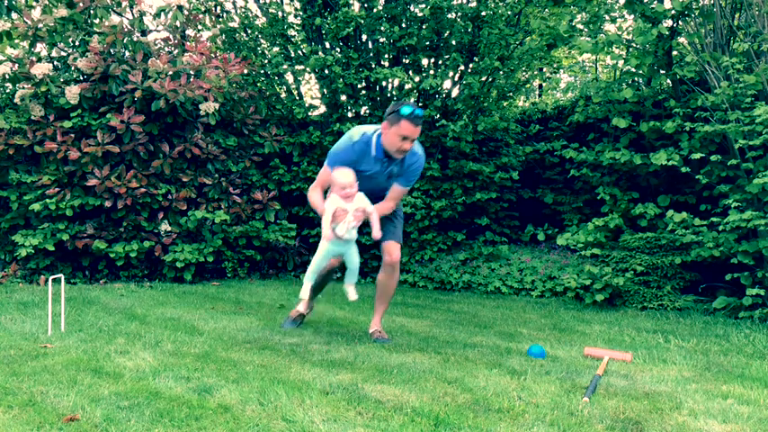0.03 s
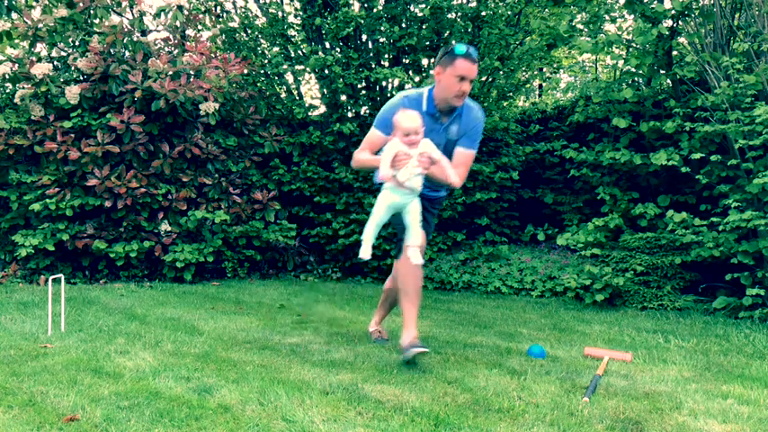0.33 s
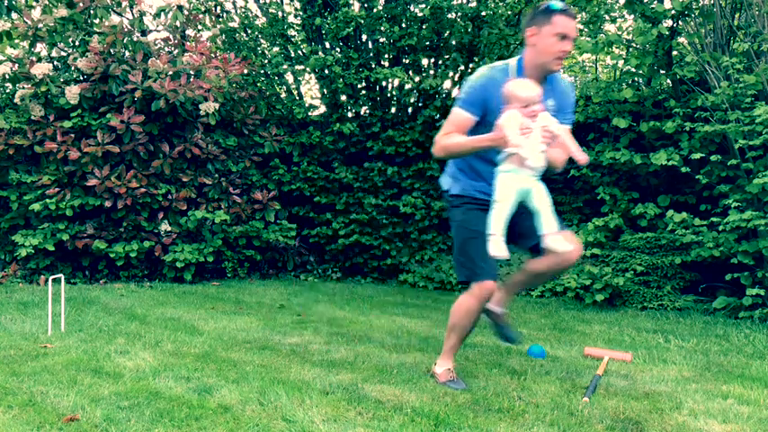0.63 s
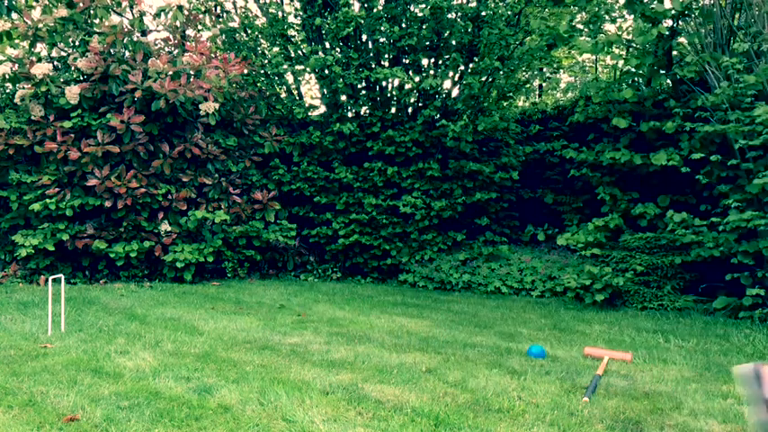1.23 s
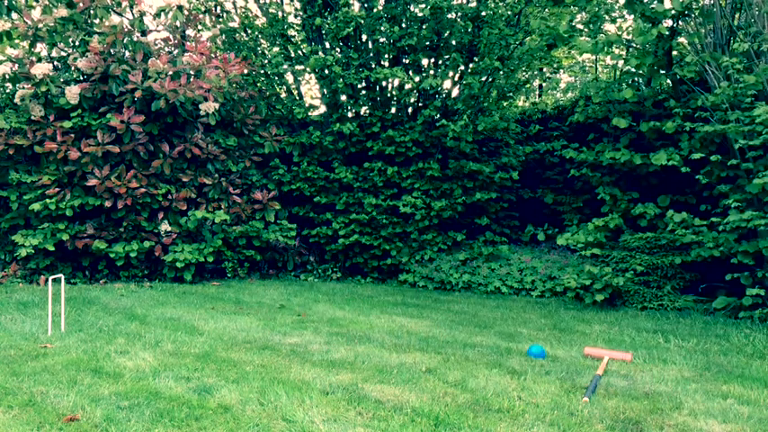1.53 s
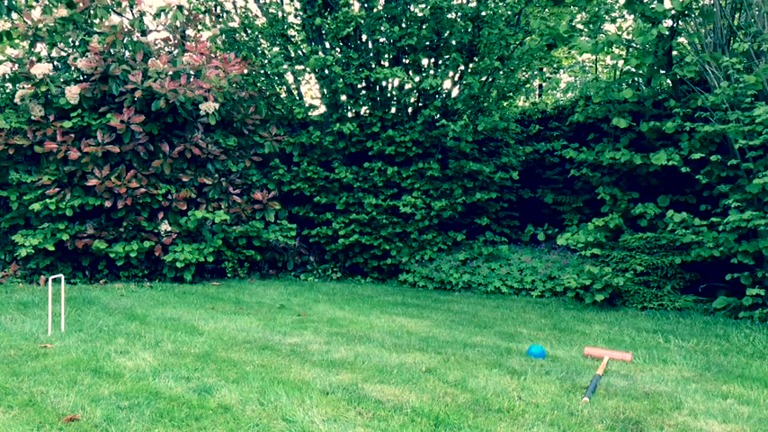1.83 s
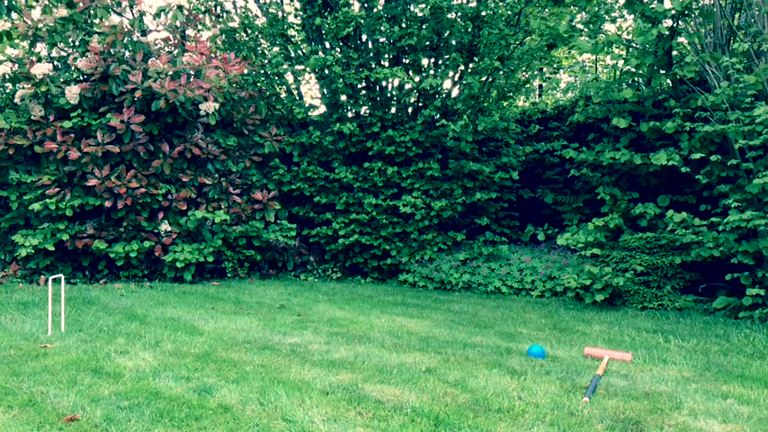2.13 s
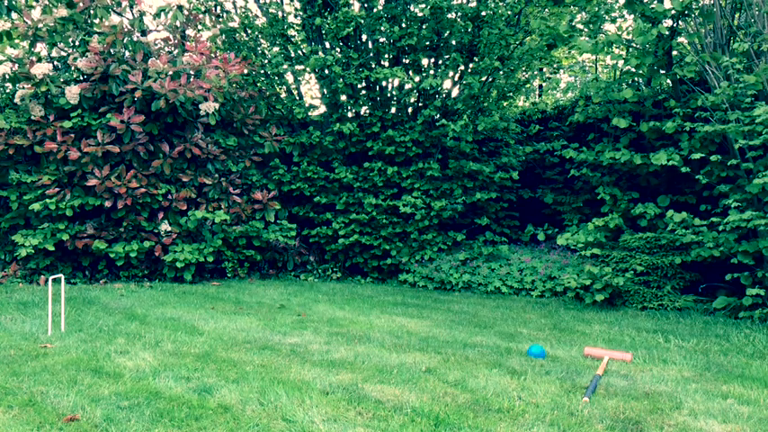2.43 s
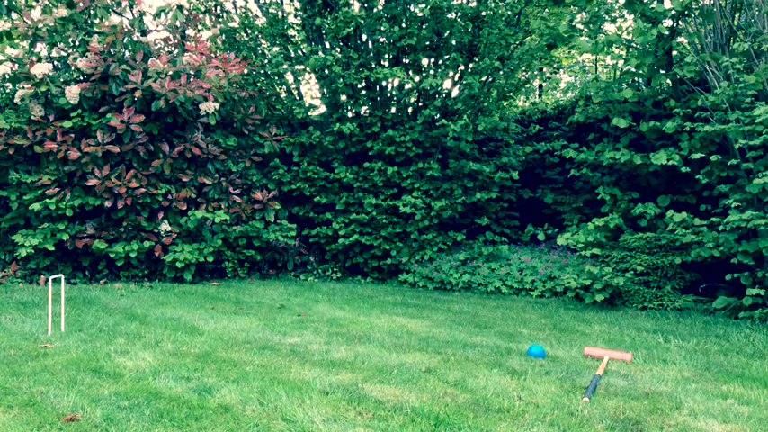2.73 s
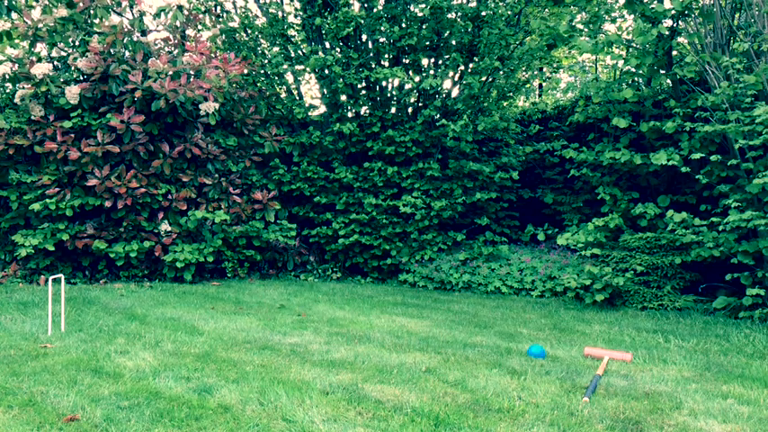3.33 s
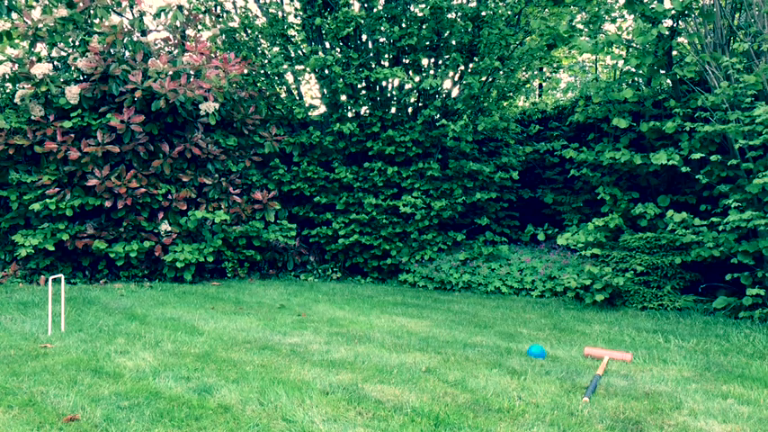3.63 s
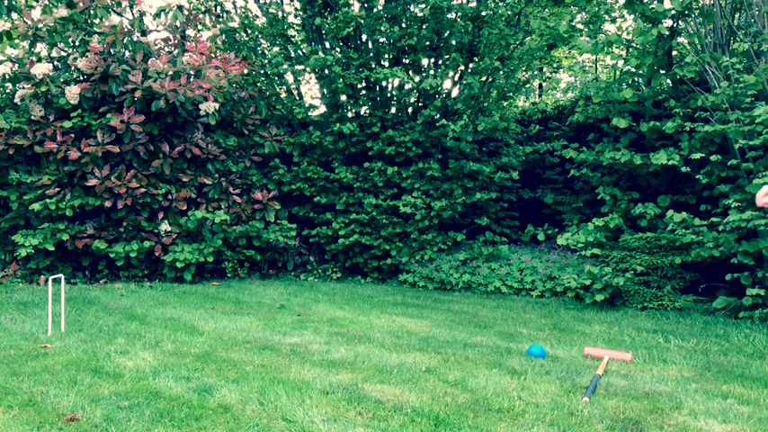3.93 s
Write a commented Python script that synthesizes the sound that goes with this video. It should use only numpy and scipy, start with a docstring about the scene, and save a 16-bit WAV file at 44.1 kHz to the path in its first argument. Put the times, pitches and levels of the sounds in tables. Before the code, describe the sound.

Someone jogs past on a garden lawn with soft, swishing steps and a faint rustle of clothes. The steps turn fainter and a small bird starts chirping in the hedge, over low wind rumble and a distant engine drone.

```python
"""A jogger on a garden lawn.

Someone jogs past and moves about further off, clothes rustling: each step excites a swish of grass and
a crunch of turf, with a few small resonant snaps. A small bird in the hedge sings frequency-modulated
tones (three short notes, a quick trill, five falling chirps), scattered by the hedge and the trees.
Behind them, two far engines drone in harmonics of their cycle rates under a low rumble of wind."""
import sys
import numpy as np
from scipy import signal
from scipy.io import wavfile

SR = 44100
rng = np.random.default_rng(int(sys.argv[2]) if len(sys.argv) > 2 else 0)


def bounce(signal):
    """Save signal as a 16-bit WAV file at the path given by the first command-line argument."""
    frames = np.transpose(np.atleast_2d(signal))
    limited = np.clip(frames, -1, 1)
    pcm = np.round(limited * 32767).astype(np.int16)
    wavfile.write(sys.argv[1], SR, pcm)


N = 176400
TIME = np.arange(N) / SR
HISS_FLICKER_DB = .7

# Gusts of the low wind: (time [s], level [dB])
GUSTS = [(0, -50), (.5, -45.5), (1.0, -46), (1.7, -47), (2.2, -46.5), (2.45, -46.5), (2.9, -48.5),
         (3.5, -52), (4, -49.5)]


def from_db(db):
    """Amplitude ratio of a level in decibels."""
    return 10 ** (np.asarray(db) / 20)


def rms_one(x):
    """Normalisation to unit mean power."""
    return x / np.sqrt(np.mean(x ** 2) + 1e-20)


def envelope(rows):
    """Amplitude envelope interpolated through (time [s], level [dB]) rows."""
    return from_db(np.interp(TIME, *np.transpose(rows)))


def drift(rate_hz):
    """Slow random modulation of unit rms: two-pole low-passed noise, drawn every 100 samples."""
    pole = np.exp(-200 * np.pi * rate_hz / SR)
    slow = signal.lfilter([1], [1, -2 * pole, pole * pole], rng.standard_normal(N // 100 + 2002))[2000:]
    return np.interp(np.arange(N) / 100, np.arange(len(slow)), rms_one(slow))


def flutter(hz, size):
    """Fast random modulation of unit rms, whose sidebands spread a tone into a band."""
    return rms_one(signal.sosfilt(signal.butter(2, hz, fs=SR, output="sos"), rng.standard_normal(size)))


def white():
    """Two uncorrelated white noises."""
    return rng.standard_normal((2, N))


def colour(sources, spectrum, flicker_db):
    """Spectral shaping to unit rms: flickering third-octave bands, taken in turn from two sources."""
    hz, db = np.transpose(spectrum)
    out, edges = 0, 25 * 2 ** (np.arange(30) / 3)
    for k, (low, high) in enumerate(zip(edges, edges[1:])):
        centre = np.sqrt(low * high)
        if hz[0] / np.sqrt(2) < centre < hz[-1] * np.sqrt(2):
            bandpass = signal.butter(2, [low, high], "band", fs=SR, output="sos")
            band_db = np.interp(np.log(centre), np.log(hz), db) + flicker_db * drift(5.7)
            out = out + signal.sosfilt(bandpass, sources[k % 2]) * from_db(band_db)
    return rms_one(out)


def add(out, onset, sound):
    """Superposition of a sound from its onset in seconds."""
    start = int(np.clip(onset * SR, 0, N))
    out[start:start + len(sound)] += sound[:N - start]


def wind():
    """Broadband flow noise: a low rumble, a far rush of air and a faint hiss."""
    # Spectra: (frequency [Hz], relative spectral density [dB])
    rumble_spectrum = [(30, -16), (45, 4), (70, 2), (110, -5), (170, -1.5), (260, 4.5), (360, 3.5),
                       (480, -1), (700, -14), (1400, -26)]
    air_spectrum = [(300, -8), (550, 0), (900, 3), (1200, -1.5), (1700, -8.5), (2100, -20), (2600, -33.5),
                    (4000, -43)]
    hiss_spectrum = [(2500, -2.5), (5000, -2), (7000, -4), (10000, -6), (15500, -5)]
    # Swells of the air: (time [s], level [dB])
    air_swells = [(0.0, -54.5), (0.46, -48), (0.66, -53.5), (1.83, -52.5), (1.9, -54), (2.74, -53.5),
                  (3.17, -51.5), (3.5, -54), (4.0, -52)]
    rumble = envelope(GUSTS) * colour(white(), rumble_spectrum, flicker_db=1.5)
    air = envelope(air_swells) * from_db(.24) * colour(white(), air_spectrum, flicker_db=1.8)
    hiss = from_db(-75) * colour(white(), hiss_spectrum, HISS_FLICKER_DB)
    return rumble + air + hiss


def engine(cycle_hz, harmonics, wander=.0019, fade_db=1.11, carried_above_hz=290):
    """Harmonic series of a wandering cycle rate; each partial fades, and the wind carries the upper ones."""
    phase = 2 * np.pi * np.cumsum(cycle_hz * (1 + wander * drift(1.235))) / SR
    carried = rms_one(envelope(GUSTS))
    out = 0
    for order, db in harmonics:
        gain = from_db(db + fade_db * drift(2.25))
        if order * cycle_hz > carried_above_hz:
            gain = gain * carried
        out = out + gain * np.sin(order * phase + rng.uniform(0, 2 * np.pi))
    return np.sqrt(2) * out


def drone():
    """Two far engines and two narrow-band hums, superposed under one slow envelope."""
    # Engine line spectra: (harmonic number, level before the envelope [dB])
    fast_harmonics = [(5, -61), (6, -41), (7, -50), (9, -42.5), (11, -56.5), (12, -55.5), (13, -53),
                      (14, -58.5), (15, -56.5), (16, -62.5), (18, -58.5), (20, -55), (21, -56.5),
                      (22, -62.5), (23, -55), (24, -65), (25, -66), (29, -66)]
    slow_harmonics = [(12, -42), (18, -48), (24, -65), (25, -62), (30, -55.5), (40, -57.5)]
    # Wavering hums: (frequency [Hz], rms deviation [Hz], level before the envelope [dB])
    hum_tones = [(79.85, 1.22, -45.5), (228.4, 2.56, -54.5)]
    # Common envelope: (time [s], gain [dB])
    swells = [(0, -4), (.7, -1.5), (1.3, 1), (1.75, 1.5), (2.05, -1.5), (2.45, 1.5), (3.0, -2), (3.4, -1),
              (4, -1)]
    hums = 0
    for hz, deviation, db in hum_tones:
        amplitude = np.sqrt(2) * from_db(db + 2.8 * drift(4.4))
        hums = hums + amplitude * np.sin(2 * np.pi * np.cumsum(hz + deviation * drift(2.47)) / SR)
    fast = engine(cycle_hz=16.59, harmonics=fast_harmonics)
    slow = engine(cycle_hz=8.955, harmonics=slow_harmonics)
    return envelope(swells) * (fast + slow + hums)


def syllable(contour, rasp_hz, warble_hz=240, warble_depth=.05, rasp_share=.8):
    """A gliding tone; at high pitch, frequency modulation adds a warble and noise modulation a rasp."""
    times, hz, db = np.transpose(contour)
    t = TIME[:int(times.max() * SR)]
    pitch = np.interp(t, times, hz) * (1 + .0082 * rng.standard_normal())
    strain = np.interp(pitch, [4250, 4700], [0, 1])
    pitch = pitch * (1 + strain * warble_depth * np.sin(2 * np.pi * (warble_hz * t + rng.random())))
    phase = 2 * np.pi * np.cumsum(pitch) / SR
    rough = rasp_share * strain
    tone = np.sqrt(1 - rough) * np.sin(phase) + np.sqrt(rough) * flutter(rasp_hz, len(t)) * np.cos(phase)
    return np.sqrt(2) * from_db(np.interp(t, times, db)) * tone


def birds():
    """Frequency sweeps: the song from the hedge, and blurred far whistles of other birds before it."""
    # Syllable contours: (time from onset [s], pitch [Hz], relative level [dB])
    note = [(0, 3920, -22), (.006, 4400, -5.5), (.012, 4600, -1.5), (.02, 4600, -11), (.03, 4560, -22)]
    trill = [(0, 3750, -18), (.008, 3550, -13), (.015, 3600, -15), (.019, 4400, -8), (.024, 4600, -6),
             (.033, 4500, -7), (.038, 4400, -14), (.040, 3750, -9), (.043, 4150, 2), (.046, 4650, -5),
             (.047, 3650, -8), (.049, 4350, -1), (.055, 5000, -14)]
    chirp = [(0, 5400, -22), (.012, 5100, -14), (.018, 4750, -8), (.025, 4400, -12), (.028, 4000, -2),
             (.032, 4180, .5), (.038, 4060, -2), (.042, 3650, -18), (.053, 2300, -22), (.059, 2680, -9),
             (.067, 2930, -10), (.073, 3000, -32), (.086, 3400, -24), (.094, 3200, -12), (.103, 3080, -20)]
    # The song: (time [s], level [dB]); the chirps add (rasp bandwidth [Hz])
    notes = [(2.134, -63), (2.274, -64.5), (2.33, -59.5)]
    trills = [(2.427, -63), (2.523, -64), (2.617, -63.5), (2.706, -59.5), (2.799, -57.5), (2.887, -57),
              (2.978, -56.5), (3.068, -55.5), (3.159, -55)]
    chirps = [(3.267, -50, 400), (3.430, -50.5, 550), (3.595, -49, 1150), (3.754, -51, 550),
              (3.916, -51.5, 550)]
    # Far whistles: (time [s], duration [s], start pitch [Hz], end pitch [Hz], level [dB])
    whistles = [(.328, .02, 10300, 11000, -72), (.38, .21, 3480, 3680, -76), (.58, .11, 3580, 3380, -76),
                (.02, .2, 2900, 2650, -74), (.3, .72, 2310, 2270, -73.5)]
    out = np.zeros(N)
    for contour, rows, rasp_hz in ((note, notes, 120), (trill, trills, 300)):
        for onset, db in rows:
            add(out, onset, from_db(db) * syllable(contour, rasp_hz))
    for onset, db, rasp_hz in chirps:
        add(out, onset, from_db(db) * syllable(chirp, rasp_hz))
    for onset, duration, start_hz, end_hz, db in whistles:
        pitch = np.linspace(start_hz, end_hz, int(duration * SR))
        swell = signal.windows.tukey(len(pitch)) * flutter(hz=90, size=len(pitch))
        add(out, onset, np.sqrt(2) * from_db(db) * swell * np.sin(2 * np.pi * np.cumsum(pitch) / SR))
    return out


def garden(direct):
    """Reverberation by scattering: a quick decay in the hedge and a long, leaf-filtered one from trees."""
    # Band returned by the trees: (lower edge [Hz], upper edge [Hz])
    leaf_band = [2850, 3700]
    blurred = direct * flutter(hz=110, size=N)
    far = signal.sosfilt(signal.butter(2, leaf_band, "band", fs=SR, output="sos"), blurred)
    out = direct
    for sound, t60_s, db in ((blurred, .11, -7), (far, .95, 1.5)):  # hedge, trees
        response = rng.standard_normal(SR) * from_db(-60 * TIME[:SR] / t60_s)
        out = out + from_db(db) * signal.fftconvolve(sound, response / np.linalg.norm(response))[:N]
    return out


def rustle():
    """Soft friction noise of grass and clothes as the person moves."""
    # Spectrum: (frequency [Hz], relative spectral density [dB])
    spectrum = [(2800, -3.5), (4400, 1), (6500, -10)]
    # Swells of the rustle: (time [s], level [dB])
    swells = [(0, -74), (.28, -81), (.45, -71), (.66, -79), (.85, -71.5), (1.6, -73.5), (2.35, -75),
              (3.1, -71.5), (4, -71)]
    return envelope(swells) * colour(white(), spectrum, HISS_FLICKER_DB)


def blades(ticks_per_s=5000, spread_db=6, tick_share=.26):
    """Shot noise from single grass blades, mixed with soft hiss, in two independent streams."""
    ticks = (rng.random((2, N)) < ticks_per_s / SR) * rng.choice([-1, 1], (2, N))
    strength = from_db(spread_db * np.minimum(rng.exponential(1, (2, N)), 5))
    return np.sqrt(tick_share) * rms_one(ticks * strength) + np.sqrt(1 - tick_share) * white()


def footsteps():
    """Friction noise of feet: a bright swish of grass and a lower crunch of turf; steps add in power."""
    # Steps: (peak time [s], swish level [dB], rise [s], fall [s], crunch relative to swish [dB])
    steps = [(.09, -69.5, 0.028, 0.052, 3.5), (.182, -64.5, 0.014, 0.013, -9),
             (.535, -62, 0.048, 0.043, -9), (.73, -71.5, 0.04, 0.15, 0.5), (.96, -60, 0.031, 0.03, 0),
             (1.05, -68.5, .03, 0.052, 1), (1.215, -62.5, 0.018, 0.069, -4.5),
             (1.343, -55, 0.025, 0.018, -1.5), (1.48, -73.5, 0.14, 0.11, 6.5),
             (1.73, -67.5, 0.022, 0.044, -15), (1.92, -67.5, 0.071, 0.16, -2), (2.13, -71, 0.018, .03, -4),
             (2.47, -70.5, .05, 0.053, 1), (2.8, -68, 0.06, 0.073, 1.5), (3.1, -65, 0.035, 0.073, -7),
             (3.4, -68, 0.15, 0.11, 2), (3.57, -68.5, 0.043, 0.057, 2), (3.73, -72, .04, 0.071, 0),
             (3.97, -64, 0.05, 0.055, 6)]
    # Grass and turf: (frequency [Hz], relative spectral density [dB])
    swish_spectrum = [(3000, -18), (4500, -4.5), (6500, -0.5), (9000, -2.5), (13000, -0.5), (15500, -5)]
    crunch_spectrum = [(1500, 3.5), (2400, -0.5), (4000, 2.5), (6000, -9.5)]
    swish_power, crunch_power = np.zeros((2, N))
    for peak, db, rise, fall, crunch_db in steps:
        from_peak = np.abs(TIME - peak) / np.where(TIME < peak, rise, fall)
        power = from_db(db) ** 2 * np.exp(-from_peak ** 1.29)
        swish_power += power
        crunch_power += power * from_db(crunch_db) ** 2
    swish = np.sqrt(swish_power) * colour(blades(), swish_spectrum, HISS_FLICKER_DB)
    crunch = np.sqrt(crunch_power) * colour(blades(), crunch_spectrum, HISS_FLICKER_DB)
    return swish + crunch


def snaps(crackle_s=.003):
    """Impulsive excitation: a click and a short crackle pass twice through one broad resonance."""
    # Snaps underfoot: (time [s], peak level [dB], resonance [Hz], bandwidth [Hz])
    impulses = [(0.7344, -42, 1650, 1100), (.9680, -32, 3730, 3160), (0.9687, -39.5, 2320, 550),
                (1.324, -37, 6000, 8000), (1.338, -39.5, 2700, 3000), (1.359, -38, 6500, 9000),
                (1.054, -45, 12000, 7000), (1.726, -47, 7000, 8000), (2.011, -47, 3800, 6000),
                (2.343, -53, 4500, 3950), (3.9835, -35.5, 3800, 4500)]
    out, t = np.zeros(N), TIME[:SR // 20]
    for onset, db, hz, bandwidth in impulses:
        snap = (t == 0) + .06 * rng.standard_normal(len(t)) * np.exp(-t / crackle_s)
        radius = np.exp(-np.pi * bandwidth / SR)
        resonator = [1, -2 * radius * np.cos(2 * np.pi * hz / SR), radius * radius]
        for _ in range(2):
            snap = signal.lfilter([1, 0, -1], resonator, snap)
        add(out, onset, from_db(db) * snap / np.abs(snap).max())
    return out


def scene():
    """Superposition of all sources at one microphone; only the birds reverberate."""
    return (drone() + wind() + rustle() + footsteps() + snaps() + garden(birds()))[None]


def record(dry):
    """Band limiting: a high-pass at 42 Hz and a steep low-pass at 15.7 kHz."""
    thin = signal.sosfilt(signal.butter(3, 42, "high", fs=SR, output="sos"), dry)
    return signal.sosfilt(signal.ellip(16, .1, 80, 15700, fs=SR, output="sos"), thin)


dry = scene()
out = record(dry)
bounce(out)
```